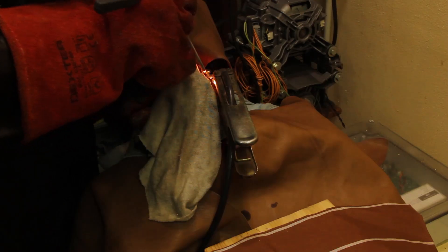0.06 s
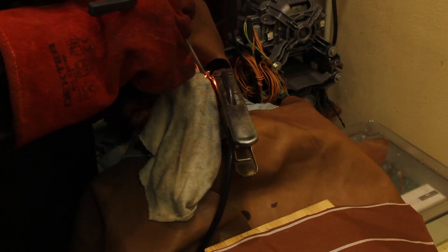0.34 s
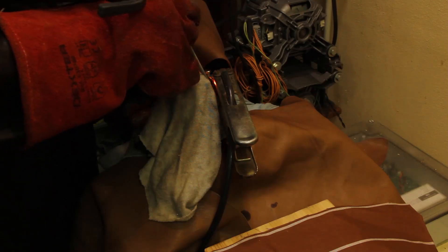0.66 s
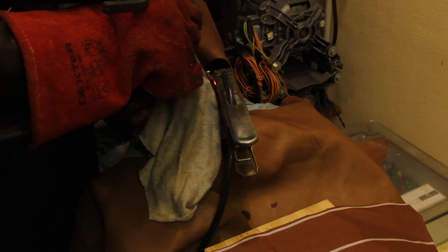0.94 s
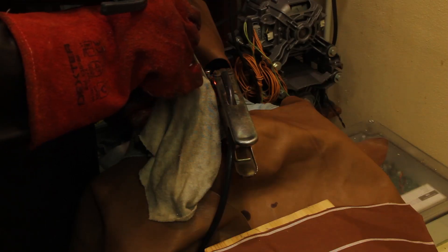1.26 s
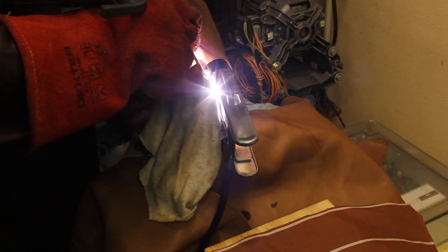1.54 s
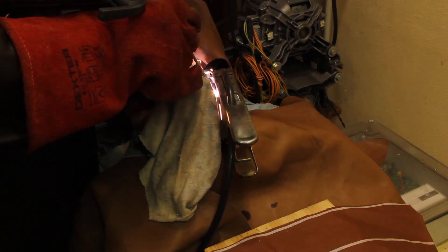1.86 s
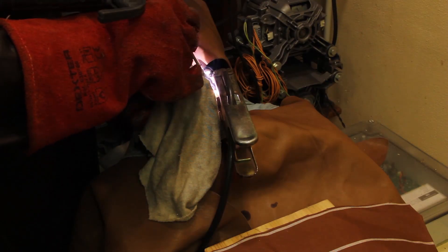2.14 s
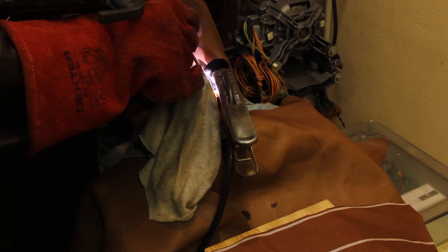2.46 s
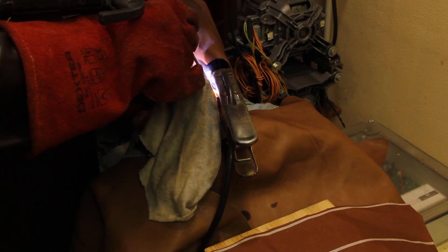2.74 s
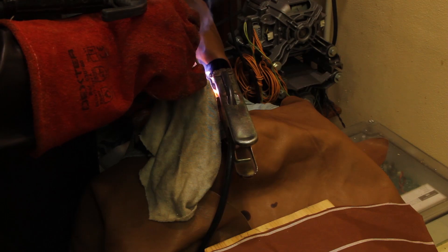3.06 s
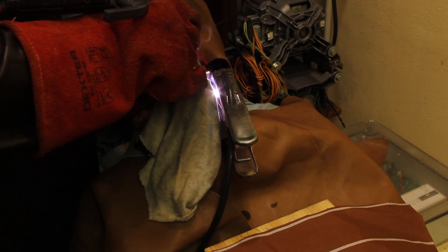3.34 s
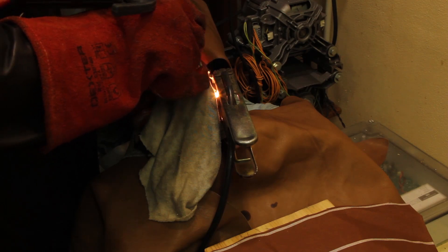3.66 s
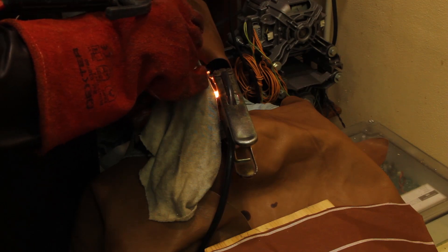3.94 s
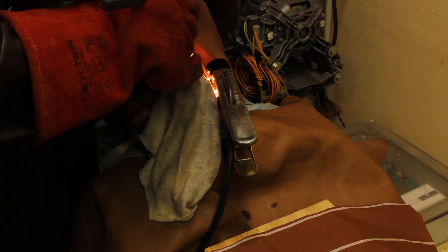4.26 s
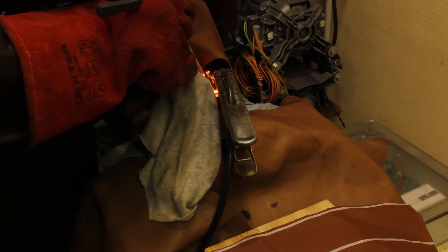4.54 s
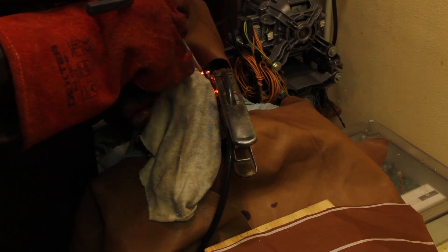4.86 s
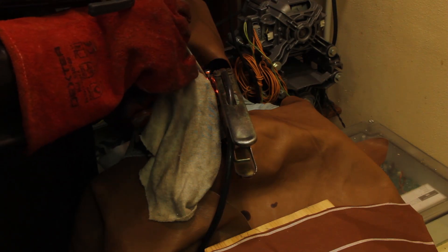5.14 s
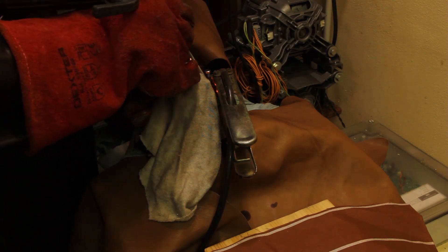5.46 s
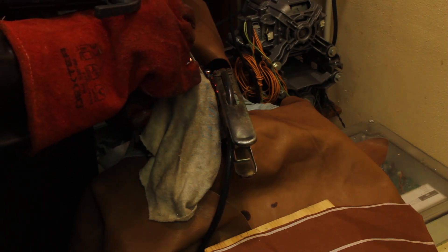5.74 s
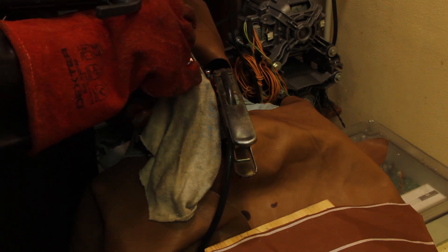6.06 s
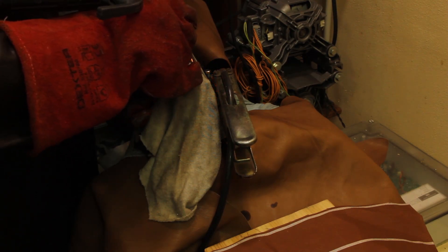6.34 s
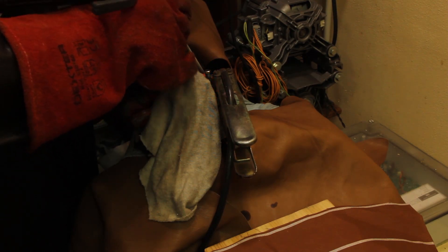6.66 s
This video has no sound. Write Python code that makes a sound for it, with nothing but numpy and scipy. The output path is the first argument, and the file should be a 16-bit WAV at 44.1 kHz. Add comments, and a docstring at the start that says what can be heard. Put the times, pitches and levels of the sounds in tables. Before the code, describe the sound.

A welding machine's fan whirs faintly with a thin, wavering whine while hot slag gives a few tiny ticks. An electrode strikes with a sudden flare and the arc fries steadily, peppered with sharp, dry pops of molten metal. After a little over two seconds it breaks off with a brief sputter, and the cooling weld ticks and crackles lightly. It is heard close up, with the short echo of a small workshop.

```python
"""At a workshop bench, someone is stick welding. The electrode strikes, flares, then fries
steadily while drops of metal short the arc and pop. It breaks off with a last pop and a sputter,
and the hot slag (the crust on the weld) ticks as it cools. Bench and walls echo closely,
and the welder's cooling fan whirs with a wavering whine throughout."""
import sys
import numpy as np
from scipy import signal
from scipy.fft import rfft, irfft, next_fast_len
from scipy.io import wavfile
from scipy.ndimage import map_coordinates

SR = 44100
rng = np.random.default_rng(int(sys.argv[2]) if len(sys.argv) > 2 else 0)


def waveform_to_disk(signal):
    """Save audio, clipped to [-1, 1], as 16-bit WAV at the path in sys.argv[1]."""
    frames = np.transpose(np.atleast_2d(signal))
    scaled = np.clip(frames, -1, 1) * 32767
    samples = np.round(scaled).astype(np.int16)
    wavfile.write(sys.argv[1], SR, samples)


N = 299439
TIME = np.arange(N) / SR


def amp(db):
    """Turns decibels into a gain."""
    return 10 ** (np.asarray(db) / 20)


def unit(x):
    """Scales a signal to an average (rms) level of 1."""
    return x / np.sqrt(np.mean(x ** 2) + 1e-20)


def along(points, hz):
    """Reads between (Hz, value) points on a log frequency scale."""
    f, values = np.transpose(points)
    return np.interp(np.log(hz + 1), np.log(f + 1), values)


def curve(points):
    """Joins (seconds, value) points with straight lines."""
    return np.interp(TIME, *np.transpose(points))


def wobble(per_s):
    """A smooth curve through per_s random values a second."""
    return map_coordinates(rng.standard_normal(int(N * per_s / SR) + 4), [TIME * per_s])


def swell(start, attack_s, hold_s, release_s):
    """A level that rises, holds and dies away."""
    t = TIME - start
    return (t / attack_s).clip(0, 1) ** 2 * np.exp(-(t - attack_s - hold_s).clip(0) / release_s)


def filtered(x, response):
    """Filters x; response gives the gain and phase at each frequency."""
    size = next_fast_len(N + SR // 2)
    return irfft(rfft(x, size) * response(np.fft.rfftfreq(size, 1 / SR)), size)[:N]


def noise(response):
    """Filtered noise at level 1."""
    return unit(filtered(rng.standard_normal(N), response))


def resonances(modes, f):
    """The response of something that rings at these (Hz, width in Hz, dB) modes."""
    return sum(amp(db) * 1j * f * width / (hz * hz - f * f + 1j * f * width) for hz, width, db in modes)


def smear(x, hz, width_hz):
    """Delays the frequencies around hz, so a click rings briefly but keeps its colour."""
    return filtered(x, lambda f: 1 - 2 * resonances([(hz, width_hz, 0)], f))


def crossover(lows, highs, hz):
    """Joins the lows of one signal to the highs of another."""
    return filtered(lows - highs, lambda f: 1 / (1 + 1j * f / hz)) + highs


def click(colour, size=2048):
    """The shortest sudden pulse with this tone colour, at energy 1."""
    gains = amp(along(colour, np.fft.rfftfreq(size, 1 / SR)))
    cepstrum = irfft(np.log(gains))
    cepstrum[1:size // 2] *= 2  # folding moves the energy to the start
    cepstrum[size // 2:] = 0
    pulse = irfft(np.exp(rfft(cepstrum)))
    return pulse / np.linalg.norm(pulse)


def impulses(times, gains):
    """One-sample kicks at the given seconds."""
    samples = np.round(np.ravel(times) * SR).astype(int).clip(0)
    return np.bincount(samples, np.ravel(gains), N)[:N]


def sparks(per_s, scatter_db):
    """Random kicks of uneven size and either sign, at level 1."""
    sizes = amp(scatter_db * rng.standard_normal(N).clip(-2, 2)) * rng.choice([-1, 1], N)
    return unit((rng.random(N) < per_s / SR) * sizes)


def bursts(rows, spatter_db, spray_db, trail_s, even_db, split_hz, count=8):
    """One kick per row, trailed by smaller ones: spatter in the lows, spray in the highs."""
    starts, db, treble_db = np.transpose(rows)
    delay, size = np.moveaxis(rng.random((len(starts), count, 2)), 2, 0)
    times = np.column_stack([starts, starts[:, None] - trail_s * np.log(1 - delay)])
    tilt_db = .5 * (treble_db - even_db)

    def kicks(level_db, trail_db):
        """Each kick shares its energy with its trail."""
        shares = np.column_stack([np.ones(len(starts)), amp(trail_db) * (2 * size - 1)])
        shares /= np.linalg.norm(shares, axis=1, keepdims=True)
        return impulses(times, amp(level_db)[:, None] * shares)
    return crossover(kicks(db - tilt_db, spatter_db), kicks(db + tilt_db, spray_db), split_hz)


# How loud the fan whines. Each row: time in seconds, relative level in dB.
WHINE_LEVELS = [(0, -52.5), (.12, -67), (.45, -55), (.6, -63.5), (1.4, -56.5), (1.65, -64), (1.9, -57),
                (2.3, -59), (3.3, -61.5), (3.55, -55.5), (3.9, -59.5), (4.78, -60.5), (4.86, -54),
                (4.95, -60.5), (6.05, -56), (6.25, -63.5), (6.75, -55)]
# Air rushing through the fan. Each row: frequency in Hz, relative level in dB.
AIR_COLOUR = [(15, -81), (25, -44), (70, -30), (144, -34), (183, -35), (322, -14), (567, -13), (648, -13.5),
              (703, -13.5), (871, -16.5), (1020, -15), (1380, -19.5), (2170, -20.5), (2770, -22.5),
              (12500, -33.5), (15500, -43)]
# The ringing of the welder's case. Each row: pitch in Hz, width in Hz, relative level in dB.
CASE_MODES = [(313, 44.6, -14), (717.8, 33.3, -1.5), (1007, 40, -13), (1210, 32, -11.5), (1600, 147, -18.5),
              (2184, 17, -14), (2910, 15, -23.5)]
# The hum of motor and mains. Each row: pitch in Hz, relative level in dB.
HUM_TONES = [(199.2, -82.5), (355.3, -78.5), (403.7, -79.5), (527.6, -81.5)]


def fan(whine_hz, drift_hz, waver_db):
    """The blades whine unsteadily; air rushes through the ringing case over a faint hum."""
    phase = 2 * np.pi * np.cumsum(whine_hz + drift_hz * wobble(25)) / SR
    whine = np.sqrt(2) * amp(curve(WHINE_LEVELS) - 1.06 + waver_db * wobble(40)) * np.sin(phase)
    air = amp(-66) * noise(lambda f: amp(along(AIR_COLOUR, f)))
    case = amp(-61) * noise(lambda f: resonances(CASE_MODES, f))
    hum = np.zeros(N)
    for hz, db in HUM_TONES:
        level = np.sqrt(2) * amp(db - 1.5 + 2.2 * wobble(4.8))
        hum += level * np.sin(2 * np.pi * hz * TIME + .85 * wobble(6))
    return whine + air + case + hum


# The ringing of the steel and the electrode holder. Each row: pitch in Hz, relative level in dB.
STEEL_MODES = [(2159, -62), (2751, -62), (2934, -59), (3445, -61), (3688, -62), (4797, -62), (5410, -63),
               (6239, -62), (6675, -60), (7413, -60), (7978, -61), (8161, -64), (8570, -63), (8839, -62),
               (9173, -63), (9765, -64), (9954, -66), (10185, -65), (10713, -65), (10917, -65)]
# Echoes off the bench and nearest walls. Each row: delay in milliseconds, gain.
NEAR_ECHOES = [(.33, .65), (.58, .38), (1.93, .68), (2.87, .33), (4.15, .62), (5.05, .48), (5.17, .4),
               (6.13, .35), (9.9, .2)]
# How long the room rings on. Each row: frequency in Hz, seconds to fade by 60 dB.
ROOM_FADE = [(300, 0.48), (3000, 0.26), (13000, 0.25)]


def workshop(x, ring_db, ring_width_hz, room_db):
    """Sparks set the steel ringing; the sound arrives directly, as close echoes and as a short tail."""
    loudest = max(db for hz, db in STEEL_MODES)
    modes = [(hz, ring_width_hz, db - loudest + ring_db) for hz, db in STEEL_MODES]
    direct = filtered(x, lambda f: 1 + resonances(modes, f))
    delay_ms, gains = np.transpose(NEAR_ECHOES)
    echoes = signal.fftconvolve(direct, impulses(delay_ms / 1000, gains)[:SR // 20])[:N]
    hz, t, spectrum = signal.stft(rng.standard_normal(SR // 2), SR, nperseg=256)
    build_up = 1 - np.exp(-t / .005)
    fade = amp(-60 * t / along(ROOM_FADE, hz)[:, None])
    tail = signal.istft(spectrum * fade * build_up, SR, nperseg=256)[1]
    reverb = signal.fftconvolve(direct, tail / np.linalg.norm(tail))[:N]
    return amp(-8.5) * (direct + smear(echoes, hz=8130, width_hz=1000) + amp(room_db) * reverb)


# Thin whistles of gas. Each row: middle and half length in seconds, pitch and width in Hz, level in dB.
GAS_JETS = [(3.361, 0.1, 12600, 1100, -50), (4.25, 0.026, 13100, 450, -53), (4.296, 0.06, 7100, 200, -65)]


def gas_jets():
    """Gas escapes from the molten pool in narrow rushes that swell and fade."""
    whistles = np.zeros(N)
    for middle, half_length, hz, width, db in GAS_JETS:
        rush = noise(lambda f: resonances([(hz, width, 0)], f) ** 2)
        whistles += amp(db) * rush * np.exp(-((TIME - middle) / half_length) ** 2)
    return whistles


# The rush of the dying flame. Each row: frequency in Hz, relative level in dB.
FLAME_COLOUR = [(30, -18), (80, -7), (250, -4), (500, 0), (1100, 2), (2500, -25)]


def flame_puff(start, db):
    """The flame goes out with one soft, low rush of air."""
    rush = noise(lambda f: amp(along(FLAME_COLOUR, f)))
    return amp(db) * rush * swell(start, attack_s=.026, hold_s=.015, release_s=.032)


# Spells of fine crackle. Each row: start and end in seconds, relative level in dB.
SLAG_CRACKLES = [(0, .58, -70), (4.33, 6.4, -75.5), (6.41, 6.79, -69.5)]
# Single cracks in the slag. Each row: start in seconds, relative level in dB.
SLAG_TICKS = [(0.04, -61), (0.11, -51), (0.1204, -50), (0.521, -69), (4.333, -43.5), (4.6074, -57),
              (4.7583, -65), (5.016, -48), (5.073, -42), (5.1258, -62), (5.6397, -45.5), (5.8915, -55),
              (5.9923, -57), (6.2944, -58), (6.46, -56), (6.482, -52.5), (6.503, -54), (6.55, -53),
              (6.728, -51)]
# Squeaks of the shrinking weld bead. Each row: start in seconds, relative level in dB.
BEAD_SQUEAKS = [(5.2362, -50.5), (5.3722, -54), (5.4496, -48.5), (5.553, -52), (5.6084, -54)]


def slag(tick_db, squeak_db, squeak_s):
    """The cooling crust crackles finely, with tiny bright ticks and thin squeaks."""
    spells = sum(amp(db) * swell(start, .02, end - start, .03) for start, end, db in SLAG_CRACKLES)
    crackle = spells * sparks(per_s=400, scatter_db=6.5)
    # A harder crack is brighter: 1.3 dB more treble for each dB of strength.
    cracks = [(start, db, -19 + 1.3 * (db + 54)) for start, db in SLAG_TICKS]
    ticks = bursts(cracks, spatter_db=-8, spray_db=-8, trail_s=.0012, even_db=-3, split_hz=8850)
    crust = filtered(amp(tick_db) * ticks + crackle, lambda f: (1j * f / (2400 + 1j * f)) ** 2)  # low cut
    slips = sum(amp(db + squeak_db) * swell(start, .00067, 0, squeak_s) for start, db in BEAD_SQUEAKS)
    squeaks = filtered(slips * rng.standard_normal(N),
                       lambda f: resonances([(9100, 1800, 0)], f) ** 2 + resonances([(4260, 1100, 0)], f) ** 2)
    return crust + squeaks


# Drops shorting the arc. Each row: start in seconds, relative level in dB, treble share in dB.
DROPS = [(2.0073, -31, -29.5), (2.068, -25.5, -12), (2.1504, -26.5, -10), (2.1931, -13, -11.5),
         (2.263, -30, 1), (2.3265, -22.5, -10.5), (2.472, -20.5, -9), (2.5392, -18.5, -3), (2.6936, -32, 5),
         (2.798, -20.5, -10), (2.846, -26.5, -2), (2.8627, -35, 1), (2.9035, -24, 2), (2.9536, -25.5, -5),
         (2.9989, -11.5, -15.5), (3.0452, -20, -9), (3.074, -28.5, -2), (3.0976, -25, -9),
         (3.1723, -26, 3.5), (3.2254, -21.5, 1), (3.3866, -27.5, 6.5), (3.411, -23, -6),
         (3.437, -17.5, -12), (3.438, -22, -9), (3.475, -20.5, 2), (3.5529, -14, -14), (3.611, -26, -3.5),
         (3.695, -27.5, -12), (3.8126, -20, -6), (3.9054, -32, 4.5), (3.9407, -26.5, 3.5),
         (4.101, -30.5, 6.5)]
# The tone of a bursting drop. Each row: frequency in Hz, relative level in dB.
DROP_COLOUR = [(40, -39), (330, -18.5), (540, -3), (900, -13.5), (1300, -1.5), (2100, -3), (3300, 3.5),
               (4500, 0.5), (6500, 3), (10000, -0.5), (15500, -3)]


def drop_pops(gain_db):
    """Each drop of metal shorts the arc and blows apart with one dry crack and a fine spray."""
    kicks = bursts(DROPS, spatter_db=-20, spray_db=-9, trail_s=.0015, even_db=-12, split_hz=5000)
    return -amp(gain_db) * signal.fftconvolve(kicks, click(DROP_COLOUR))[:N]


# The burn, from the strike until the electrode is drawn away.
# Each row: time in seconds, relative level in dB.
BURN_LEVELS = [(1.612, -84), (1.63, -42.5), (1.96, -43.5), (2.3, -41), (2.44, -41.5), (2.75, -40),
               (2.98, -36.5), (3.1, -40), (3.55, -37), (3.68, -45), (3.72, -36), (3.79, -45), (3.92, -38.5),
               (3.96, -63), (4.2, -62.5), (4.45, -100)]
# Flares at the strike and sputters as the arc breaks.
# Each row: start and hold in seconds, relative level in dB, brightness in dB.
ARC_FLARES = [(1.616, .005, -26, -1.5), (1.625, 0.018, -33.5, -2), (1.788, .012, -38, -4),
              (1.801, 0.042, -38.5, -6), (1.841, .006, -31, -5.5), (1.857, 0.04, -33, -3.5),
              (4.213, .008, -41.5, -1.5), (4.237, 0.019, -41, -2)]
# The tone of the frying arc. Each row: frequency in Hz, relative level in dB.
FRY_COLOUR = [(40, -49), (200, -28.5), (520, -6), (900, -13.5), (1250, -0.5), (2100, -1.5), (3400, 4.5),
              (4500, 0.5), (6500, 2), (10000, -0.5), (13500, -3), (15500, -9.5)]
# The arc's low roar on cold metal. Each row: frequency in Hz, relative level in dB.
ROAR_COLOUR = [(30, -32), (130, -12), (220, -16.5), (300, -9.5), (580, 2), (900, -4), (3000, -40)]


def arc_sizzle(hiss_db, spit_db, roar_db, flutter_db, waver_db, heat_s):
    """The arc fries with dense sparks and stray spits on plasma hiss, and roars until the pool is hot."""
    # A drop bridges the gap and quiets the arc just before it pops.
    short_s, dip_db = .0047, 7
    shorted = sum(np.exp(-((TIME - start + short_s / 2) / short_s) ** 2) for start, _, _ in DROPS)
    burn_db = curve(BURN_LEVELS) + waver_db * wobble(35) + flutter_db * wobble(160)
    burn = amp(burn_db - dip_db * shorted.clip(0, 1))
    # The sizzle brightens as the pool heats up, losing lows and gaining highs.
    strike_s = ARC_FLARES[0][0]
    cold = np.exp(-(TIME - strike_s).clip(0) / heat_s)
    layers = [(burn, 3.5 - 6 * cold)]
    for start, hold_s, db, bright_db in ARC_FLARES:
        layers.append((amp(db) * swell(start, .0057, hold_s, .014), bright_db))
    lows = np.sqrt(sum((gain * amp(-1.56 * bright_db)) ** 2 for gain, bright_db in layers))
    highs = np.sqrt(sum((gain * amp(.37 * bright_db)) ** 2 for gain, bright_db in layers))
    fry = amp(-2.5) * unit(sparks(per_s=1700, scatter_db=4) + amp(hiss_db) * rng.standard_normal(N))
    spits = amp(spit_db) * burn * sparks(per_s=65, scatter_db=2.5)
    roar = amp(roar_db) * np.sqrt(cold) * burn * noise(lambda f: amp(along(ROAR_COLOUR, f)))
    sizzle = crossover(fry * lows, fry * highs, hz=5660) + spits
    return signal.fftconvolve(sizzle, click(FRY_COLOUR))[:N] + roar


def scene():
    """Arc, drops and slag sound in the workshop over the fan; drops and slag are heard more directly."""
    arc = arc_sizzle(hiss_db=-7, spit_db=-7.5, roar_db=-18.5, flutter_db=2.1, waver_db=.7, heat_s=.79)
    crust = slag(tick_db=18, squeak_db=4.5, squeak_s=.0051)
    weld = workshop(arc + amp(-2) * crust, ring_db=-2, ring_width_hz=107, room_db=1)
    drops = workshop(drop_pops(gain_db=18), ring_db=-5, ring_width_hz=100, room_db=-1.3)
    gas = gas_jets() + flame_puff(start=4.225, db=-59)
    whir = fan(whine_hz=708.8, drift_hz=1.2, waver_db=1.6)
    return (weld + drops + amp(-8.5) * crust + gas + whir)[None]


def record(dry):
    """The microphone's port rings briefly on clicks and rounds off the hardest; the top treble is cut."""
    ringing = smear(dry[0], hz=5000, width_hz=4000)
    ringing = smear(ringing, hz=11000, width_hz=3500)
    rounded = ringing / (1 + (ringing / .38) ** 4) ** (1 / 4)
    return filtered(rounded, lambda hz: 1 / (1 + (hz / 15500) ** 120))[None]


dry = scene()
out = record(dry)
waveform_to_disk(out)
```